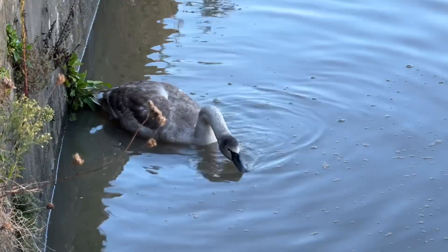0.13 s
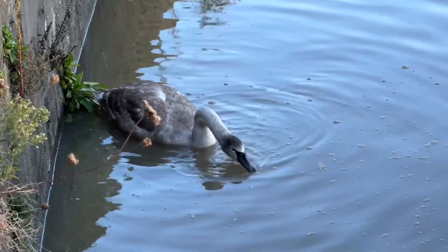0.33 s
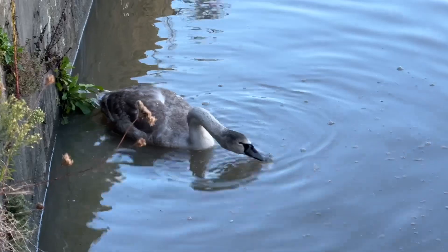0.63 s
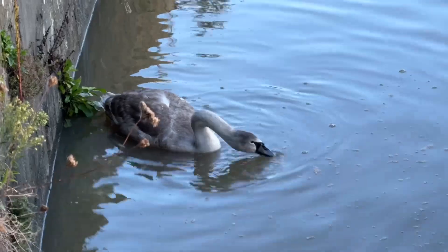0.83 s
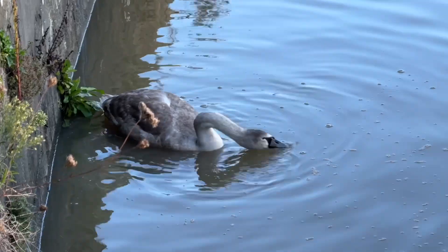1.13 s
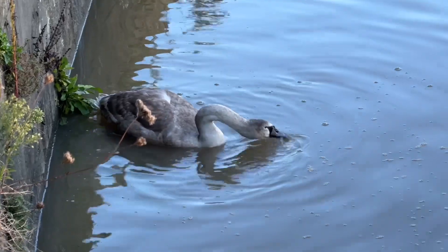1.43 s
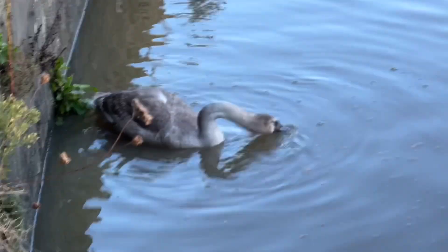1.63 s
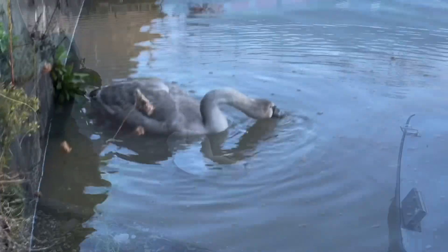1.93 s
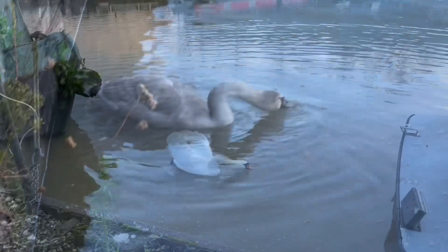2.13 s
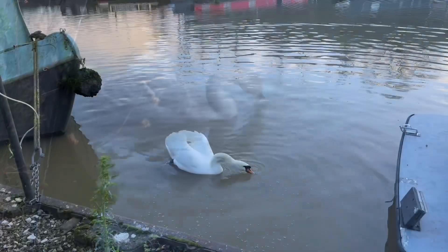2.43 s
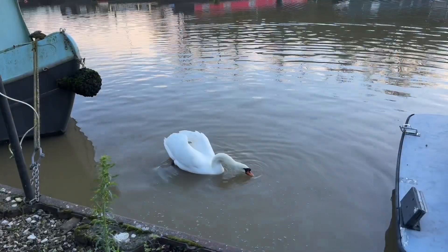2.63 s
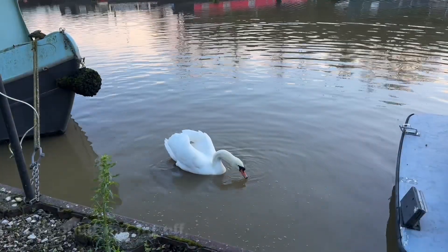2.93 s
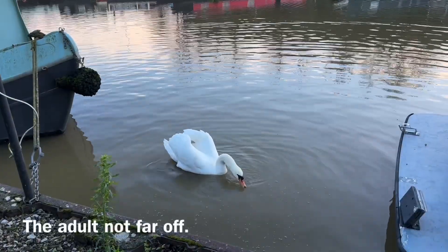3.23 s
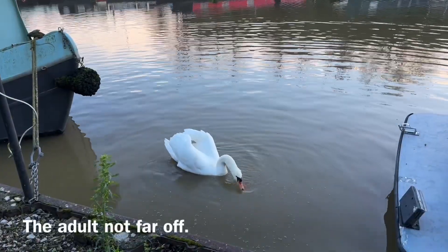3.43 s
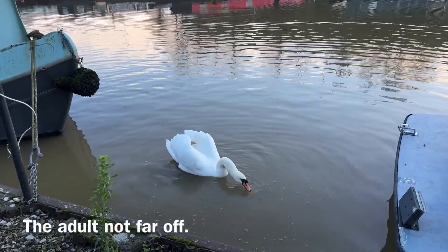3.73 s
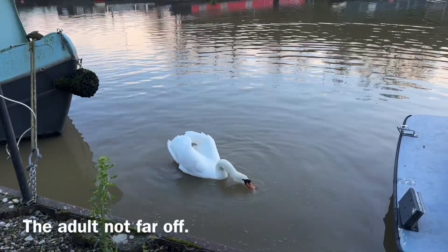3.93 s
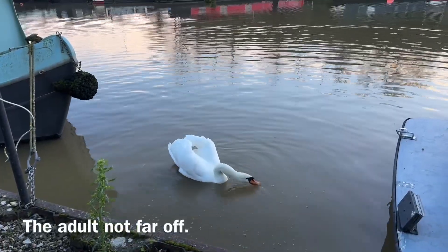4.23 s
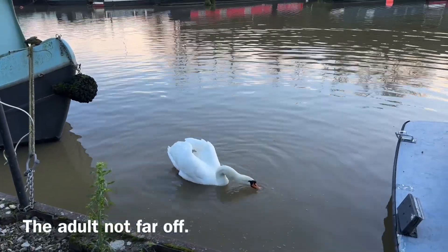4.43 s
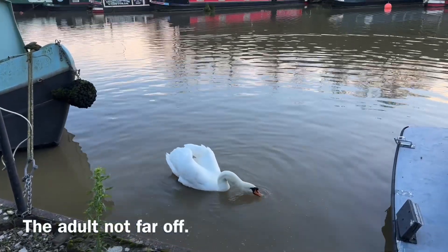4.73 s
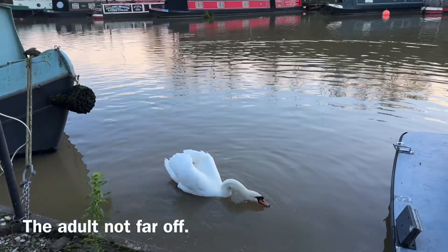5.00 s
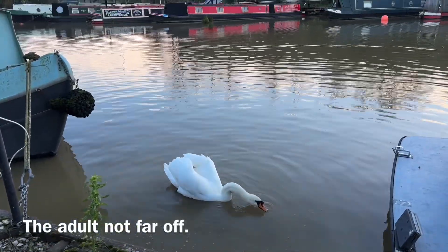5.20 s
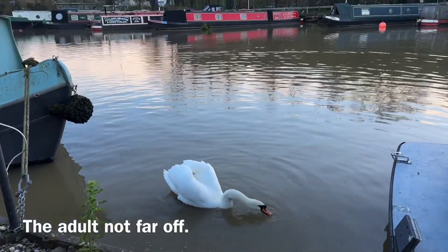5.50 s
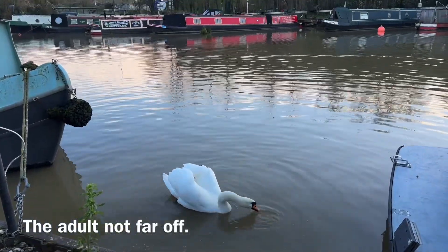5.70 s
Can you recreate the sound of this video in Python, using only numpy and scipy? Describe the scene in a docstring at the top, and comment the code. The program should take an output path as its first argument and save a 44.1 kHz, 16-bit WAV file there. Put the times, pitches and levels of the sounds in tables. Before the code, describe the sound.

From 0 to 2 s, a young swan feeds beside a quay wall. Single soft bill splashes come at about 0.2, 0.5 and 1.1 s, with two hard, dry ticks near 0.5 s and a brief thin hiss around 0.8 s. Small drops plip, dull water gulps knock at 1.1 to 1.6 s, and a distant low drone swells around 1 s over soft rumble, a low tone emerging before it fades. Between 1.6 and 2.7 s this crossfades to a boat diesel idling steadily across the basin, a low hum with a rapid throb. The adult's light snaps patter from 2 to 3 s, thin out slightly, then from 3.9 s become dense, bubbly dabbling with gurgles, spray and rounded plops, ending on a prominent plop near 5.8 s. Sharp high clicks stand out near 3.5 and 4.1 s. Faint trickling and lapping continue throughout; the outdoor stereo pickup has only short reflections.

```python
"""Swans dabbling at a marina

Each snap of the bill slaps the water, rings bubbles, throws spray and stirs the water; drops plop between.
At first a distant drone swells and fades by the quay wall, with sharp ticks and a thin hiss close by;
then it gives way to a boat diesel idling across the basin. High clicks, water knocks and lapping fill in.
Rings, shaped noise and summed waves make these sounds; a small stereo microphone stands on the bank."""
import sys
import numpy as np
from scipy import signal
from scipy.fft import rfft, irfft
from scipy.io import wavfile
from scipy.ndimage import uniform_filter1d

SR = 44100
rng = np.random.default_rng(int(sys.argv[2]) if len(sys.argv) > 2 else 0)


def wrap_up_sound(samples):
    """Save the sound to the file named by the first command line argument, as 16-bit audio."""
    columns = np.atleast_2d(samples).T
    # keep every value between -1 and 1, then stretch to whole-number steps
    tamed = np.clip(columns, -1, 1)
    steps = np.round(tamed * 32767).astype(np.int16)
    wavfile.write(sys.argv[1], SR, steps)


N = 258426
T = np.arange(N) / SR  # time in seconds
FREQ = np.fft.rfftfreq(N, 1 / SR)  # frequency in Hz

# Levels in the tables come before the echoes, fades and final balance.
# Swells of sound. Each row: peak time in seconds, peak level in dB, rise in dB per second,
# fall in dB per second. A negative rate turns the slope around.
DRONE_BODY_SWELLS = [(0.9, -36, 10.5, 5)]
DRONE_UPPER_SWELLS = [(1.17, -38.3, 14.5, 20)]
DRONE_TONE_SWELLS = [(1.59, -37.5, 22, 109), (1.86, -33.5, 73.5, 30.8)]
QUAY_RUMBLE_SWELLS = [(0.1, -38, -26, 38), (0.6, -37, 131, 55), (1.55, -39.5, 8, -4)]
THIN_HISS_SWELLS = [(0.76, -47, 65, 176), (0.868, -51, 307, 130), (1.06, -66.5, 103, 110),
                    (1.5, -66.5, 38, 28)]
SOFT_WASH_SWELLS = [(0.72, -57, 7, 33), (4.92, -64, 48, 15)]
# The distant drone's resonances. Each row: pitch in Hz, width setting in Hz, relative level in dB.
DRONE_LOW_RESONANCES = [(168.4, 24, 2.5), (195.1, 49, 3), (280.5, 48, -7)]
DRONE_HIGH_RESONANCES = [(356, 37.3, 1.5), (418, 17, -12.5), (487, 74, -9.5), (657.5, 38, -13),
                         (810, 81, -25.5)]
# Tone colours. Each row: frequency in Hz, relative level in dB.
RUMBLE_SPECTRUM = [(20, -22), (32, -7), (52, -3.5), (85, -4), (125, -10.5), (190, -21), (260, -15.5),
                   (450, -22.5), (700, -34), (1200, -42.5), (3000, -87.5)]
WASH_SPECTRUM = [(300, 6), (700, 3), (1500, 11.5), (2900, 9), (4100, 4), (5500, 6.5), (7500, 9.5),
                 (9000, -12.5), (11000, 7.5), (14800, 0), (16000, -63)]
HISS_SPECTRUM = [(1000, -45), (3000, 1), (5000, 34.5), (8000, 33.5), (11000, 41), (14700, 48.5), (15900, 8)]
WATER_SPECTRUM = [(400, -14), (800, 4.5), (1500, 5), (2200, 3.5), (2950, 3.5), (4100, -5), (5400, -3.5),
                  (7200, -6), (8800, -12), (11000, -101), (14800, 7), (16000, -31)]
SLAP_SPECTRUM = [(400, -14), (900, -3.5), (2900, 10), (4100, 6.5), (5400, 9.5), (7200, 7), (8800, -27),
                 (11000, 4), (14800, -14), (16300, -25)]
HIGH_CLICK_SPECTRUM = [(2000, -19), (5500, -11), (8000, -31), (10800, 0.5), (13000, -9), (16000, -17)]
# Snaps of the bill. Each row: time in seconds, splash level in dB, slap level in dB relative to the
# splash, middle pitch of the bubbles in Hz.
BILL_SNAPS = [(0.16, -50, -12, 2200), (0.508, -51, 6, 3230), (1.0638, -50, 2.5, 2280),
              (1.392, -60.5, 14.5, 2200), (1.478, -54.5, -13, 1540), (1.7446, -51.5, -7, 2220),
              (1.925, -59, 4, 1580), (1.945, -56.5, -1, 3000), (2.038, -51.5, 6.5, 4040),
              (2.132, -47, -2, 2960), (2.2418, -50.5, 1.5, 2120), (2.26, -61, 10, 3620),
              (2.3675, -51.5, -4, 1760), (2.501, -53.5, -7, 2360), (2.543, -58, 11.5, 4000),
              (2.6188, -49.5, -2.5, 3460), (2.737, -51, 2.5, 3100), (2.7643, -51, -7, 2970),
              (2.8716, -53.5, -0.5, 3060), (3.029, -60.5, -3, 2350), (3.2923, -52.5, -10, 1580),
              (3.338, -54, 3.5, 3020), (3.348, -46.5, -3, 3360), (3.4614, -48.5, 5.5, 1520),
              (3.568, -56, 5.5, 2250), (3.852, -56.5, 2, 2860), (3.9501, -44.5, 0.5, 2600),
              (4.06, -41.5, 1.5, 1960), (4.152, -53.5, 0, 2580), (4.158, -49.5, 3.5, 4000),
              (4.264, -47, 2, 1490), (4.279, -56.5, 3, 2870), (4.371, -45, -3, 1280),
              (4.404, -60.5, 9, 3200), (4.4723, -46.5, 11.5, 2680), (4.509, -55, 1, 1250),
              (4.575, -47, -2, 2900), (4.622, -52.5, -3, 3520), (4.6397, -51.5, -2, 3000),
              (4.6935, -46, -7.5, 1640), (4.805, -49, -3, 5150), (4.817, -46.5, -3, 2420),
              (4.879, -44.5, -12.5, 2000), (4.914, -51.5, -2, 2980), (4.941, -49.5, 1.5, 2520),
              (5.028, -48, 1.5, 1090), (5.0556, -47, -0.5, 2170), (5.143, -46.5, -7, 2770),
              (5.196, -59.5, 14.5, 3370), (5.284, -48.5, -5, 2050), (5.3294, -49, -3.5, 1380),
              (5.3862, -56.5, 11, 3340), (5.471, -56.5, 2, 2120), (5.534, -45, -15, 1410),
              (5.589, -52, 1.5, 1530), (5.691, -52.5, -20, 1310), (5.745, -53, -4, 1690),
              (5.83, -51, -8, 1540)]
# Single drops that plop into the water. Each row: time in seconds, level in dB, bubble pitch in Hz,
# decay time in cycles.
WATER_DROPS = [(0.3663, -36.5, 1700, 0.89), (0.7997, -41.5, 5300, 4), (0.921, -45, 5560, 4.5),
               (1.101, -46, 2380, 1.5), (0.991, -41, 3240, 4), (1.2068, -43, 2370, 2.4),
               (1.308, -44, 3330, 1.7), (1.377, -44, 2270, 3.9), (1.4795, -40, 1510, 1),
               (1.509, -44, 1950, 1.6), (1.59, -33.5, 2340, 0.8), (1.654, -34, 1800, 0.88),
               (1.752, -39.5, 2200, 1.3), (1.829, -44, 2200, 1.8), (1.853, -43.5, 1740, 1.6),
               (2.1876, -41.5, 3000, 4.6), (2.269, -44, 1040, 2.4), (2.3015, -33.5, 2180, 0.82),
               (2.766, -51, 1810, 3.9), (2.782, -41.5, 1140, 1.2), (2.792, -58, 1850, 2.6),
               (2.954, -48, 1860, 2.7), (3.051, -41.5, 3020, 4), (3.176, -40, 2860, 2.9),
               (3.2619, -35.5, 1570, 0.33), (3.3477, -29, 1450, 1.2), (3.372, -43, 774, 1.6),
               (3.464, -41.5, 800, 1.5), (3.516, -34, 1530, 1), (3.621, -40.5, 2810, 4.3),
               (3.738, -41.5, 1360, 1.8), (3.752, -49, 3190, 3.4), (3.872, -41.5, 1800, 1.1),
               (3.86, -36, 870, 0.48), (3.9722, -30.5, 1490, 1.2), (3.9924, -44, 5200, 6.6),
               (4.16, -36.5, 1120, 3.6), (4.195, -39.5, 1470, 4.6), (4.4143, -38, 2230, 1.9),
               (4.489, -30, 1730, 1.4), (4.5023, -35, 2520, 1.9), (4.5107, -31.5, 2230, 2.6),
               (4.587, -37.5, 1070, 2.2), (4.64, -32.5, 2950, 1.6), (4.709, -42, 1820, 1.9),
               (4.738, -31, 1950, 0.55), (4.819, -30, 1624, 2.9), (4.8665, -31, 2650, 1.9),
               (4.8862, -35, 2170, 1.8), (4.93, -35.5, 1590, 1.6), (5.1696, -37, 950, 1.1),
               (5.3993, -43, 4450, 4.4), (5.546, -28.5, 2220, 2.9), (5.563, -38.5, 1086, 3.6),
               (5.629, -46, 1580, 5.3), (5.6712, -43, 1020, 1.9), (5.702, -36, 1210, 1.5),
               (5.765, -39, 2970, 2), (5.8357, -22, 1540, 1.7)]
# Dry ticks close by. Each row: time in seconds, level in dB, ring pitch in Hz, crack level in dB
# relative to the tick, lingering rattle in dB relative to the tick.
DRY_TICKS = [(0.476, -26, 3020, -1, -12), (0.4795, -31, 3020, -8, -21), (0.492, -13.5, 3310, -17.5, -27),
             (0.516, -34, 2530, -7, -26), (0.5388, -11, 2880, -14.5, -26.5)]
# Low knocks and gulps of water. Each row: time in seconds, level in dB, starting pitch in Hz, churn
# in dB relative to the knock, glide as the log change of pitch per decay time.
WATER_KNOCKS = [(1.082, -28, 350, -12, 0.0044), (1.2, -21.5, 183, -10, -0.12),
                (1.234, -25.5, 350, -48, 0.035), (1.48, -21, 200, -14, 0.065), (1.622, -29, 216, -6, 0.15),
                (2.2193, -26.5, 405, -38, -0.34), (3.034, -34, 307, -37, 0.067),
                (3.193, -35.5, 336, -49, -0.0088), (4.059, -39, 314, -11, 0.098),
                (5.835, -30, 430, -10, -0.53)]
# Thin, very high clicks, many of them at the moment of a snap. Each row: time in seconds, level in dB.
HIGH_CLICKS = [(1.295, -29.5), (1.388, -29), (1.697, -25), (2.652, -28.5), (2.8727, -30), (3.1868, -28.5),
               (3.46, -16), (3.862, -35), (3.9492, -29.5), (4.06, -17.5)]
# The diesel's hum. Each row: multiple of the engine cycle, level in dB.
DIESEL_ORDERS = [(4, -55.7), (7, -58.2), (8, -55.8), (9, -57), (10, -57), (11, -62.4), (12, -59.1),
                 (13, -60.2), (14, -61.8), (15, -52.0), (16, -44.4), (17, -58.3), (18, -57.2), (19, -59.6),
                 (20, -62.1), (26, -70), (32, -65.5), (34, -60.5), (35, -61), (36, -61.5), (38, -64.5),
                 (40, -65.5), (48, -73), (51, -74)]

QUAY_FADE_S = (1.82, 2.68)  # the sounds by the quay wall die away
DIESEL_FADE_S = (1.6, 2.64)  # the diesel fades in
CYCLE_HZ, THROB_S = 8.976, 4.215  # engine cycles a second, time that sets the throb's place
BASIN_RUMBLE_DB = -49.5
SETTLE_S = 0.99  # decay time of the stir
CALM_DB = -9  # unstirred water, relative to the mean stir
TRICKLE_DB, LAP_DB, WASH_DB = -67.5, -64.5, -74  # base levels
# Parts of a snap in dB relative to its splash, and parts of a drop relative to its bubble, before the balance.
BUBBLE_DB, GURGLE_DB, LEAD_DB, BACKWASH_DB = 3.5, -10.5, -5, -9.5
DROP_SPRAY_DB, DROP_TAP_DB = -25, -24
# Smaller bubbles follow as the bill opens again: mean delay, pitch range, decay and climb.
GURGLE_S, GURGLE_HZ, GURGLE_CYCLES, GURGLE_GLIDE = 0.03, (760, 3200), 3.2, 0.06
LEAD_S = 0.0024  # build-up time of a short burst of noise that swells into each snap
BACKWASH_S = 0.04  # mean delay before thrown water falls back
CLUSTER_S, CLUSTER_SPREAD = 0.008, 0.27  # trapped air breaks up: longest delay, log spread of pitch
HARD_SLAP = 0.96  # dB by which a slap's decay shortens for each dB that it stands above its splash
RAGGED_DB = 8  # spray comes in uneven spurts
DROP_RISE = 0.35  # share of its decay time over which a drop's bubble builds up
DROP_GLIDE = 0.035  # log climb of its pitch per decay time
PORT_HZ, PORT_TURN_HZ, PORT_LAG_S = 9550, 8900, .000328  # microphone port resonance and lag
TOP_HZ = 16100  # top of the microphone's range


def undb(db):
    """Turn decibels into a gain."""
    return 10 ** (np.asarray(db) / 20)


def unit(x):
    """Scale a sound to an average (RMS) strength of 1."""
    return x / np.sqrt(np.mean(x ** 2))


def colour(x, points):
    """Filter to a (Hz, dB) spectrum with no sound ahead of its cause."""
    hz, db = np.transpose(points)
    log_gain = np.log(undb(np.interp(np.log(FREQ + 1), np.log(hz), db)))
    # Folding the cepstrum forward in time makes the filter minimum phase.
    cepstrum = irfft(log_gain, N)
    cepstrum[1:N // 2] *= 2
    cepstrum[N // 2 + 1:] = 0
    return irfft(rfft(x) * np.exp(rfft(cepstrum)), N)


def resonate(x, modes, order=1):
    """Add up resonances of (Hz, width, dB) side by side; order 2 has steep skirts."""
    f = FREQ + 1e-3  # avoids dividing by zero
    response = 0
    for hz, width, db in modes:
        detuning = (f * f - hz * hz) / (f * width)
        response = response + undb(db) / (1 + 1j * detuning) ** order
    return irfft(rfft(x) * response, N)


def noise(side_db):
    """Stereo noise; side_db sets how much the two channels differ."""
    mid, side = rng.standard_normal((2, N))
    return unit(mid + undb(side_db) * side * np.array([[1], [-1]]))


def walk(rate):
    """Random wander of RMS size 1, smoothed between about `rate` new values a second."""
    k = int(SR / rate)
    steps = np.repeat(rng.standard_normal(N // k + 1), k)
    return unit(uniform_filter1d(steps, k)[:N])


def pan(x, left_db):
    """Make the left channel louder than the right by left_db."""
    return x * undb(np.array([[left_db], [-left_db]]) / 2)


def add(track, s, sound):
    """Mix a short sound into a track at s seconds."""
    i = int(np.clip(s * SR, 0, N - 1))
    track[i:i + len(sound)] += sound[:N - i]


def swells(table):
    """Gain of swells that rise and fall at steady rates in dB; their powers add."""
    power = 0
    for s, db, rise, fall in table:
        drop_db = np.maximum(rise * (s - T), fall * (T - s))
        power = power + undb(db - drop_db) ** 2
    return np.sqrt(power)


def stir():
    """How agitated the water is, around 1: every snap adds energy, which then settles."""
    energy = 0
    for s, db, _, _ in BILL_SNAPS:
        energy = energy + undb(db) * (T > s) * np.exp(-np.abs(T - s) / SETTLE_S)
    return np.sqrt(energy / energy.mean() + undb(CALM_DB) ** 2)


def crackle(rise_s, decay_s):
    """A burst of tiny cracks, a few of them much stronger than the rest."""
    t = T[:SR // 30]
    shape = (1 - np.exp(-t / rise_s)) * np.exp(-t / decay_s)
    cracks = rng.standard_normal(len(t)) ** 3 * shape
    return cracks * np.sqrt(np.sum(shape ** 2) / np.sum(cracks ** 2))


def bubble(hz, cycles, glide, rise=0.26):
    """A damped ring: its pitch climbs as a bubble nears the surface, or falls as a hollow opens."""
    turns = T[:int(5 * cycles / hz * SR) + 2] * hz
    swell = 1 - np.exp(-turns / rise)  # builds up over `rise` cycles
    phase = np.cumsum(hz * np.exp(glide * turns / cycles)) / SR
    return swell * np.exp(-turns / cycles) * np.sin(2 * np.pi * phase)


def droplets(times, sizes, low_hz=900, high_hz=9000, cycles=4.6):
    """Tiny bubbles of many pitches, each a short damped ring, with the colour of the water."""
    out = np.zeros(N)
    for s, size, (pitch, length) in zip(times, sizes, rng.random((len(times), 2))):
        hz = low_hz * (high_hz / low_hz) ** pitch
        ring = bubble(hz, cycles * (0.24 + 2 * length ** 2), 0.058)
        add(out, s, size * hz / low_hz * ring)
    return colour(out, WATER_SPECTRUM)


def quay(x, early_db, early_s, late_db, late_s):
    """Quick reflections off wall and hulls and a faint tail, partly different in each ear."""
    first = noise(side_db=-2.0) * np.exp(-T / early_s) * (T > .001)
    tail = noise(side_db=2.5) * np.exp(-T / late_s) * (T > .012)
    echo = undb(early_db) * unit(first) + undb(late_db) * unit(tail)
    return x + irfft(rfft(x) * rfft(echo / np.sqrt(N)), N)


def drone():
    """A distant roar of noise in a few resonances swells and fades; a low tone comes out as it goes."""
    body = unit(resonate(noise(side_db=-20.0), DRONE_LOW_RESONANCES, order=2)) * swells(DRONE_BODY_SWELLS)
    upper = unit(resonate(noise(side_db=-12.5), DRONE_HIGH_RESONANCES, order=2))
    upper = upper * swells(DRONE_UPPER_SWELLS)
    tone_hz = np.where(T > 1.6, 106.2, 89.96)  # the tone steps up once
    tone = unit(np.sin(2 * np.pi * np.cumsum(tone_hz) / SR))
    tone = tone * swells(DRONE_TONE_SWELLS) * undb(2.0 * walk(24.72))
    tone = tone * np.interp(T, [1.3, 1.45], [0, 1])
    return (body + upper + tone) * np.interp(T, QUAY_FADE_S, [1, 0])


def air():
    """Filtered noise: low rumble of the town, a soft wash that grows with the stir, swells of thin hiss."""
    by_quay = np.interp(T, QUAY_FADE_S, [1, 0])
    flutter = undb(0.8 * walk(30))
    rumble_gain = np.hypot(undb(BASIN_RUMBLE_DB), by_quay * swells(QUAY_RUMBLE_SWELLS))
    rumble = unit(colour(noise(side_db=-7), RUMBLE_SPECTRUM)) * rumble_gain
    wash_gain = np.hypot(undb(WASH_DB) * stir(), swells(SOFT_WASH_SWELLS))
    wash = unit(colour(noise(side_db=-36), WASH_SPECTRUM)) * wash_gain
    hiss = unit(colour(noise(side_db=-39), HISS_SPECTRUM)) * swells(THIN_HISS_SWELLS)
    return rumble + (wash + hiss * by_quay) * flutter


def trickle(count=6000):
    """Fine drips and fizz as water runs through the bill, more when the water is stirred."""
    times = rng.random(count) * N / SR
    sizes = undb(4.5 * rng.exponential(size=count).clip(0, np.pi))
    drops = droplets(times, sizes, low_hz=868, high_hz=8300, cycles=2)
    drops = unit(quay(drops, early_db=-1.0, early_s=0.0086, late_db=-8, late_s=0.11))
    nearness_db = np.interp(T, QUAY_FADE_S, [6, 0])  # the first bird feeds closer by
    return drops * undb(TRICKLE_DB + nearness_db) * np.sqrt(stir())


def lapping(count=2600):
    """Ripples fold against the bank in a dense murmur of soft, low bubbles whose level wavers."""
    times = rng.random(count) * N / SR
    folds = droplets(times, rng.rayleigh(size=count), low_hz=374.0, high_hz=680, cycles=1.0)
    folds = resonate(folds, [(503, 276, 0)], order=2)
    folds = unit(quay(folds, early_db=19.0, early_s=0.016, late_db=-6, late_s=0.17))
    return folds * undb(LAP_DB) * undb(2.2 * walk(10))


def dabbling(rise_s=0.0029, slap_s=0.0031, spray_s=0.009, fizz_s=0.014, lead_s=.002,
             cycles=2.1, glide=0.0097, count=80):
    """A snap slaps, rings bubbles, gurgles and throws spray; a drop taps and sprays a little."""
    slaps, rings, fizz = np.zeros(N), np.zeros(N), np.zeros(N)
    times, sizes = [], []
    t = T[:SR // 7]

    def splash(s, spray_db):
        """Spray and fizz thrown up at one moment, as a noise burst and many droplets."""
        shape = (1 - np.exp(-t / 0.0014)) * np.exp(-t / fizz_s)
        add(fizz, s - lead_s, undb(spray_db) * rng.standard_normal(len(t)) * shape)
        times.extend(s - lead_s + rng.gamma(1.6, spray_s, count))
        sizes.extend(undb(spray_db) * rng.rayleigh(size=count))

    for s, db, slap_db, hz in BILL_SNAPS:
        # Trapped air breaks up into a cluster of bubbles.
        for late, pitch in rng.random(size=(5, 2)):
            bubble_hz = hz * np.exp(CLUSTER_SPREAD * (2 * pitch - 1))
            ring = bubble(bubble_hz, cycles, glide, rise=0.44)
            add(rings, s + CLUSTER_S * late ** 2, undb(db + BUBBLE_DB) * ring)
        splash(s, db)
        splash(s + BACKWASH_S * (.5 + rng.random()), db + BACKWASH_DB)
        # A short burst of noise swells into the snap.
        lead_in = rng.standard_normal(len(t)) * np.exp(-t[::-1] / LEAD_S)
        add(fizz, s - t[-1], undb(db + LEAD_DB) * lead_in)
        # A hard slap is quicker, above all in its rise.
        quick = undb(-HARD_SLAP * max(slap_db, 0))
        add(slaps, s, undb(db + slap_db) * crackle(rise_s * quick ** 2, slap_s * quick))
        # Later gurgle bubbles are weaker.
        for late, pitch, strength in rng.random(size=(14, 3)):
            gurgle_hz = GURGLE_HZ[0] * (GURGLE_HZ[1] / GURGLE_HZ[0]) ** pitch
            gain = undb(db + GURGLE_DB) * (.5 + strength) * (1 - late / 2)
            add(rings, s + 2 * GURGLE_S * late, gain * bubble(gurgle_hz, GURGLE_CYCLES, GURGLE_GLIDE))
    for s, db, _, _ in WATER_DROPS:
        splash(s, db + DROP_SPRAY_DB)
        add(slaps, s, undb(db + DROP_TAP_DB) * crackle(rise_s, slap_s / 2))

    spray = droplets(times, sizes, low_hz=680, high_hz=8230, cycles=1.35)
    ragged_fizz = colour(fizz * undb(RAGGED_DB * walk(250)), WATER_SPECTRUM)
    wet = undb(3.5) * rings + undb(-14.5) * spray + undb(-12) * ragged_fizz
    wet = quay(wet, early_db=-4.5, early_s=0.0035, late_db=-19, late_s=0.07)
    smack = undb(7.5) * colour(slaps, SLAP_SPECTRUM)
    smack = quay(smack, early_db=-6, early_s=.004, late_db=-16, late_s=.04)
    return pan(wet, left_db=-1.5) + pan(smack, left_db=3.5)


def plips(bubble_db=5):
    """Each drop traps one bubble, which rings briefly and cleanly and climbs a little."""
    out = np.zeros(N)
    for s, db, hz, cycles in WATER_DROPS:
        ring = bubble(hz, cycles, DROP_GLIDE, rise=DROP_RISE * cycles)
        add(out, s, undb(db + bubble_db) * ring)
    out = quay(out, early_db=-1.5, early_s=0.0023, late_db=-21, late_s=0.032)
    return pan(out, left_db=-3.0)


def ticks(crack_s=0.0018, linger_s=0.03):
    """Hard little ticks: a bright crack, a short ring and a faint, rough rattle that lingers."""
    out, linger, t = np.zeros(N), np.zeros(N), T[:SR // 8]
    for s, db, hz, crack_db, linger_db in DRY_TICKS:
        add(out, s, undb(db + crack_db + 6.5) * crackle(rise_s=0.00021, decay_s=crack_s))
        add(out, s, undb(db - 5.5) * bubble(hz, cycles=3.8, glide=-0.01))
        add(linger, s, undb(db + linger_db) * rng.standard_normal(len(t)) * np.exp(-t / linger_s))
    rough = linger * undb(3.5 * walk(180))
    rattle = resonate(rough, [(2950, 420, 6), (2350, 350, 0), (1650, 450, 3)])
    spectrum = [(700, -13.5), (2700, -0.5), (4300, -13.5), (5600, 1.0), (8000, -6.0), (15000, -11.0)]
    out = colour(out + rattle, spectrum)
    return quay(out, early_db=-6.0, early_s=0.0049, late_db=-41.0, late_s=0.028)


def knocks(churn_s=0.003):
    """Dull, quickly damped gulps of water, each a low ring with a short churn of noise."""
    rings, churn, t = np.zeros(N), np.zeros(N), T[:SR // 12]
    for s, db, hz, churn_db, glide in WATER_KNOCKS:
        add(rings, s, undb(db) * bubble(hz, cycles=2.28, glide=glide))
        add(churn, s, undb(db + churn_db) * rng.standard_normal(len(t)) * np.exp(-t / churn_s))
    gulps = rings + resonate(churn, [(370, 320, 14.7), (585, 41, 2.6)], order=2)
    return quay(gulps, early_db=-9, early_s=0.0023, late_db=-9, late_s=0.31)


def high_clicks(rise_s=0.00097, decay_s=0.00093):
    """Thin, very high clicks: short crackles of noise, many of them at the moment of a snap."""
    out = np.zeros(N)
    for s, db in HIGH_CLICKS:
        add(out, s, undb(db + 3.0) * crackle(rise_s, decay_s))
    out = colour(out, HIGH_CLICK_SPECTRUM)
    return quay(out, early_db=-11, early_s=0.006, late_db=-19, late_s=0.03)


def diesel(dispersion=0.83, hull_db=-54):
    """Low engine orders bunch into a rising throb each cycle; high ones hum steadily; the hull rumbles."""
    orders, levels_db = np.transpose(DIESEL_ORDERS)
    offset = orders - orders[np.argmax(levels_db)]  # distance from the exhaust resonance
    cycle = CYCLE_HZ * (T - THROB_S) + 0.0013 * walk(4.1)
    hum = 0
    for k, db, d in zip(orders, levels_db, offset):
        # Low orders run ahead of the throb, high ones trail it.
        phase_shift = dispersion * min(d, 0) ** 2 + 0.13 * max(d, 0) ** 2
        if d >= 10:
            phase_shift = np.pi / 2 * d ** 2  # far above the resonance they spread over the whole cycle
        wave = undb(db) * unit(np.cos(2 * np.pi * k * cycle - phase_shift))
        hum = hum + pan(wave, left_db=3 / (1 + (d / 6) ** 2))
    low_hull = resonate(noise(side_db=5.5), [(79.5, 300, -49.0), (167, 270, -26.0)], order=2)
    high_hull = resonate(noise(side_db=2), [(316, 60, 0)], order=2)
    hull = undb(hull_db) * unit(low_hull) + undb(-59) * unit(high_hull)
    return (hum * undb(.5 * walk(8.7)) + hull) * np.interp(T, DIESEL_FADE_S, [0, 1])


def scene():
    """Mix the drone, air, water, bill, ticks and diesel."""
    background = drone() + air() + diesel()
    water = trickle() + lapping() + dabbling() + plips() + knocks()
    return background + water + ticks() + high_clicks()


def record(dry):
    """Microphone ports whistle at one resonance; above it the left lags. Deep bass and top are cut."""
    sound = dry + resonate(dry.mean(axis=0), [(PORT_HZ, 260, 16)])
    turn = np.interp(FREQ, [PORT_TURN_HZ, PORT_HZ], [0, np.pi])  # the left phase flips on the way up
    lag = turn + 2 * np.pi * PORT_LAG_S * np.maximum(FREQ - PORT_HZ, 0)
    left = irfft(rfft(sound[0]) * np.exp(-1j * lag), N)
    sound = np.array([left, sound[1]])
    sound = signal.sosfilt(signal.butter(6, 30, "high", fs=SR, output="sos"), sound)
    return signal.sosfilt(signal.ellip(8, .2, 70, TOP_HZ, fs=SR, output="sos"), sound)


dry = scene()
out = record(dry)
wrap_up_sound(out)
```